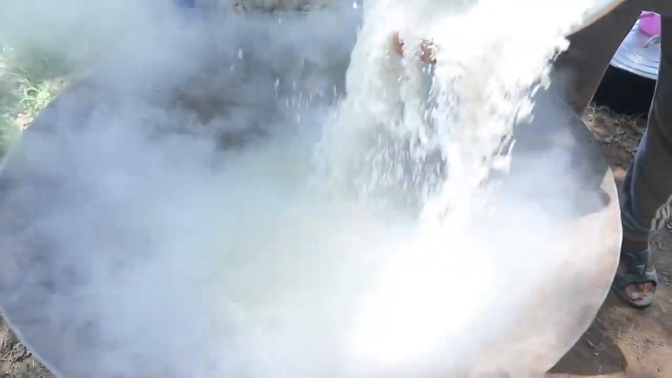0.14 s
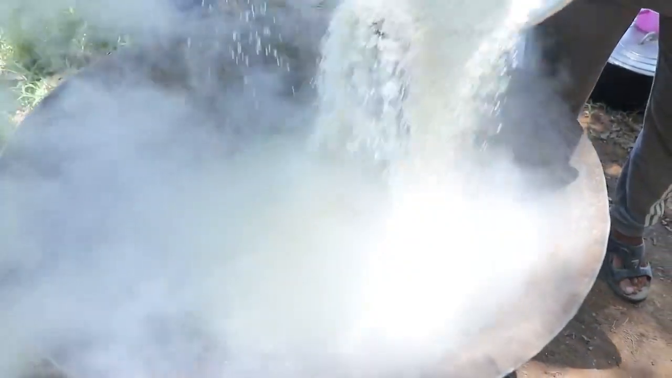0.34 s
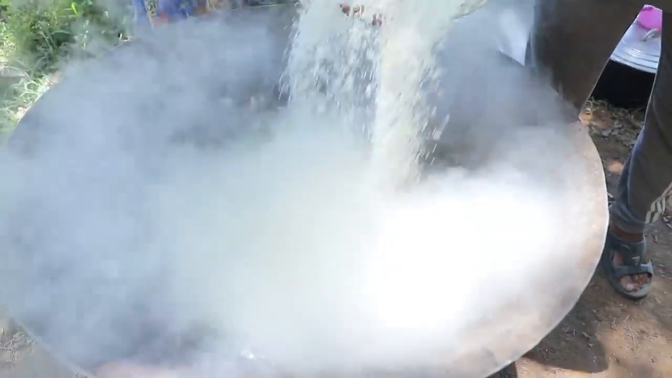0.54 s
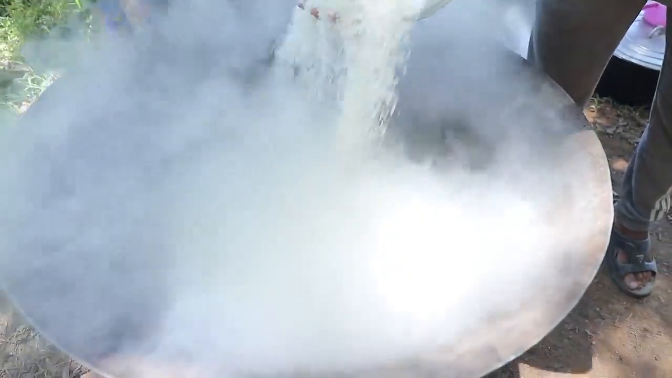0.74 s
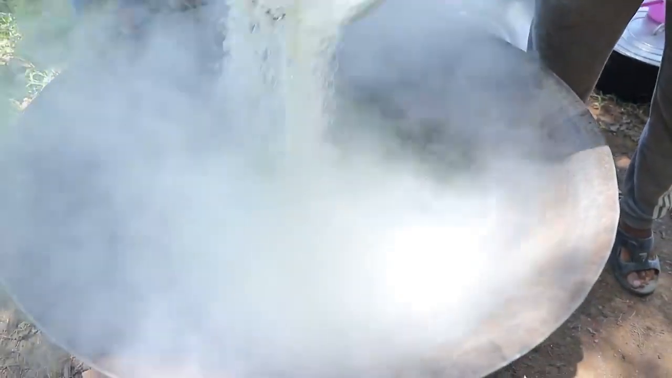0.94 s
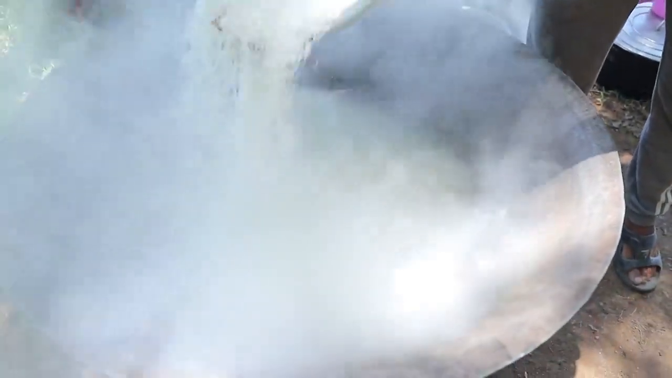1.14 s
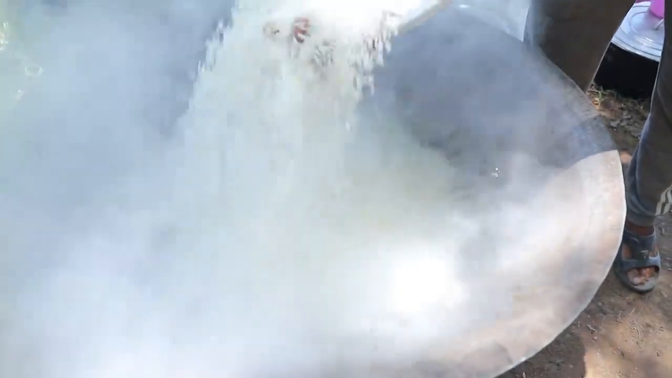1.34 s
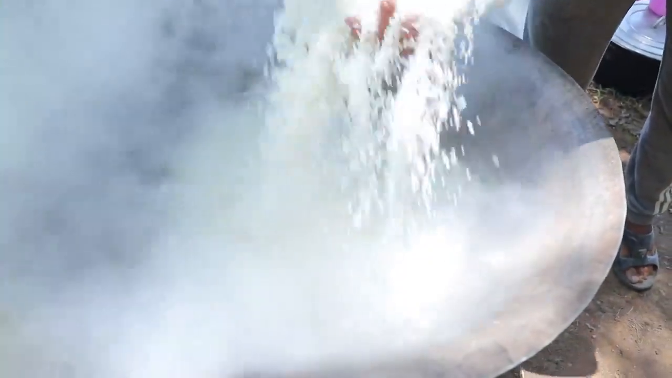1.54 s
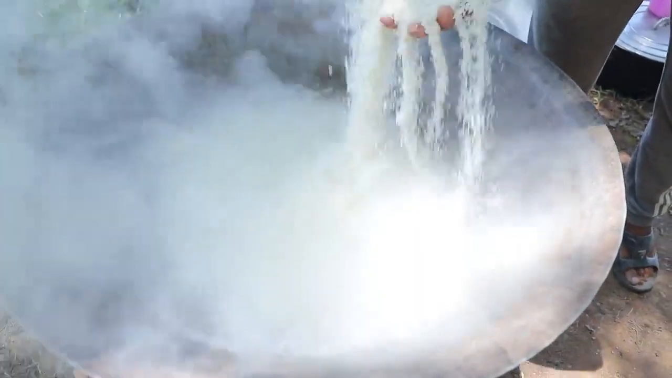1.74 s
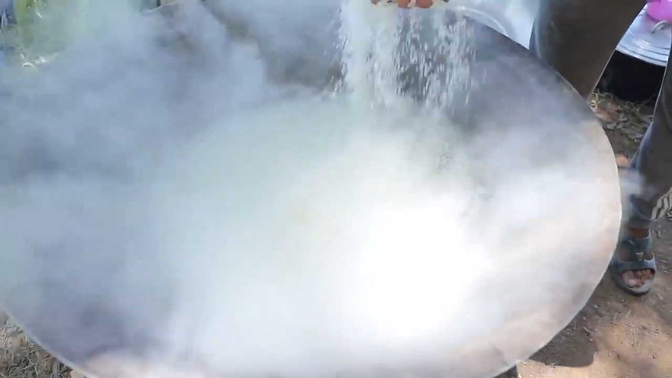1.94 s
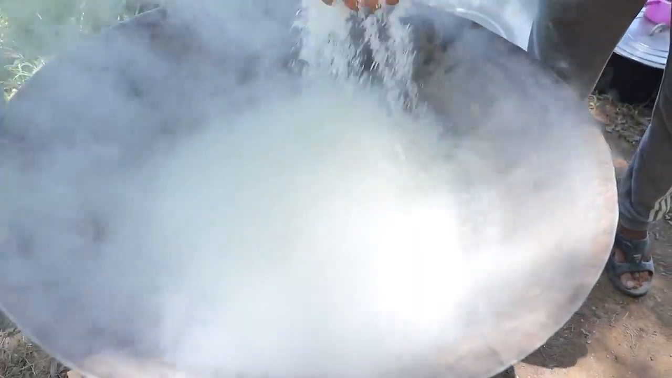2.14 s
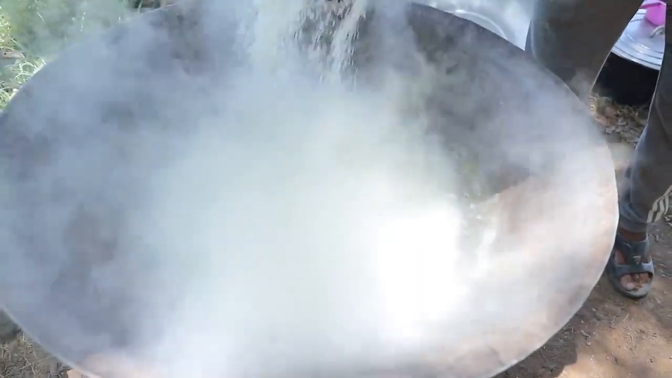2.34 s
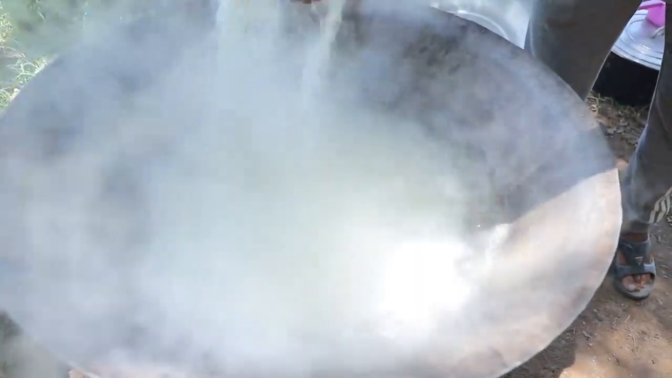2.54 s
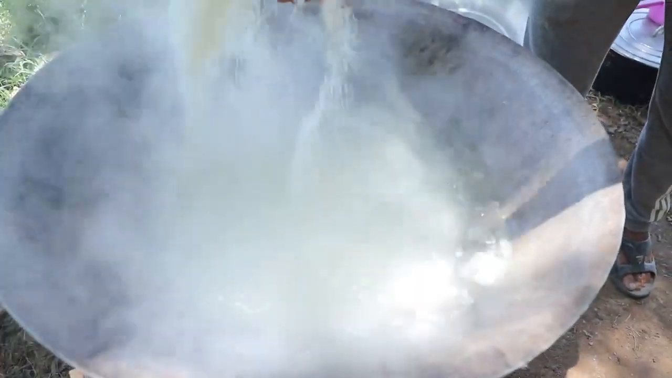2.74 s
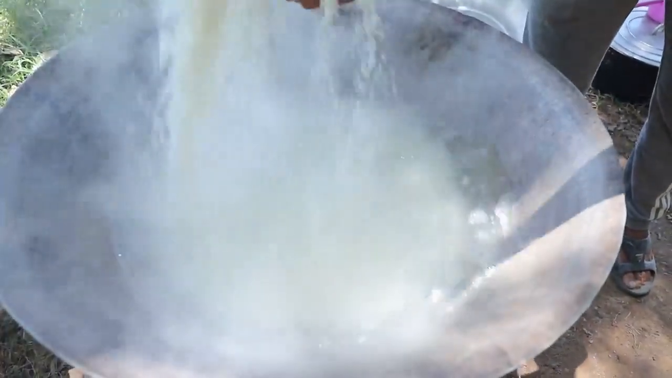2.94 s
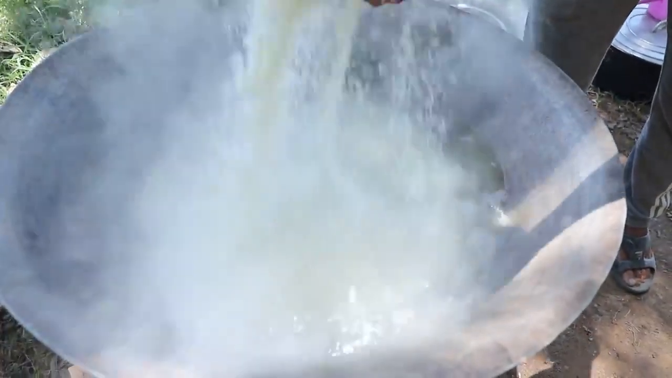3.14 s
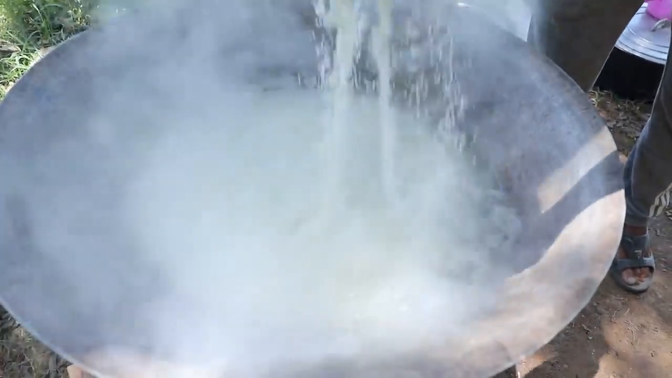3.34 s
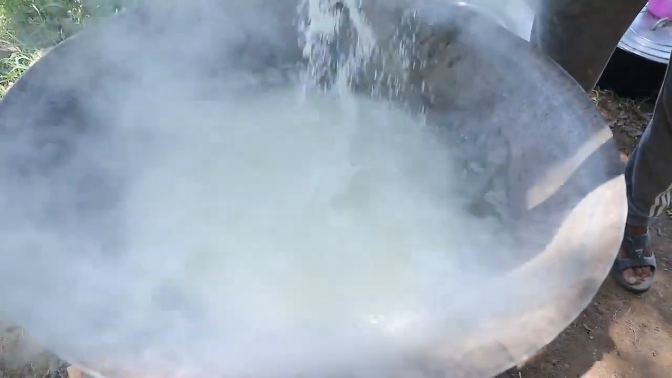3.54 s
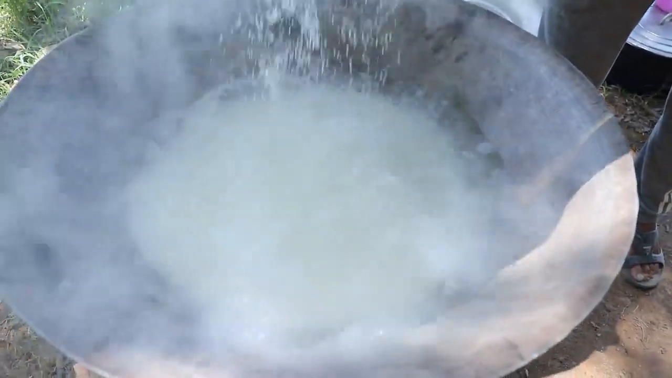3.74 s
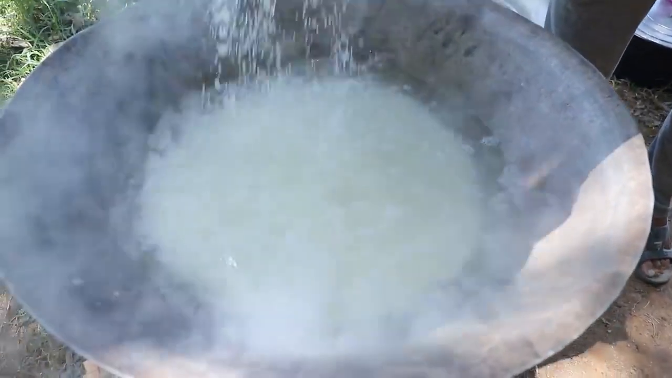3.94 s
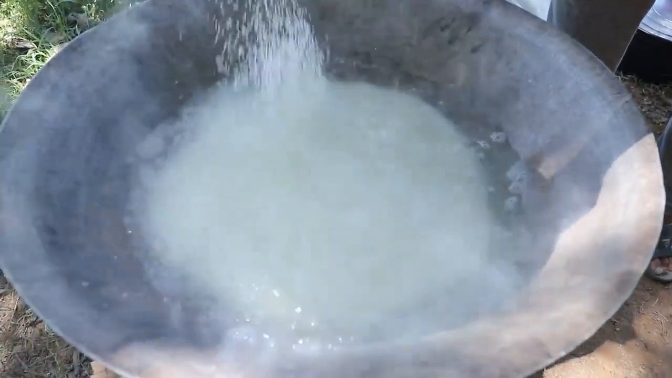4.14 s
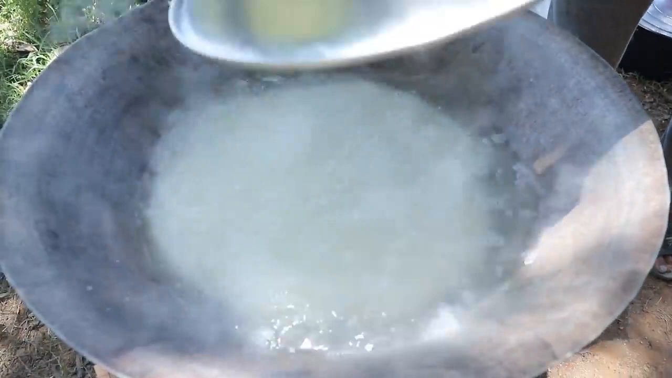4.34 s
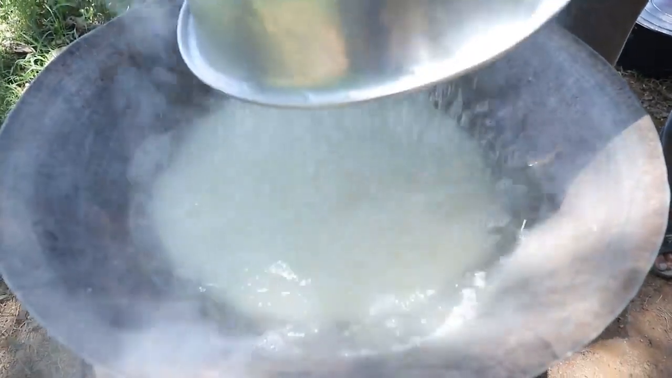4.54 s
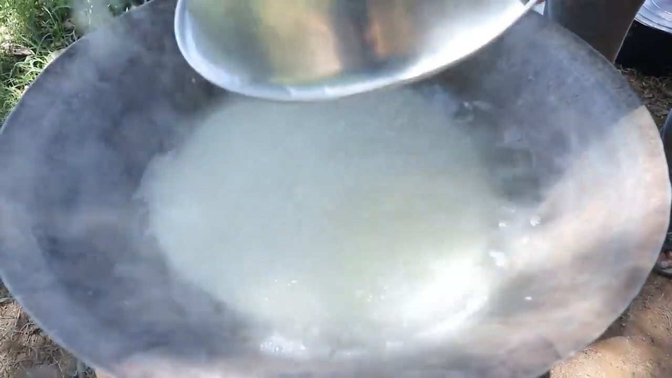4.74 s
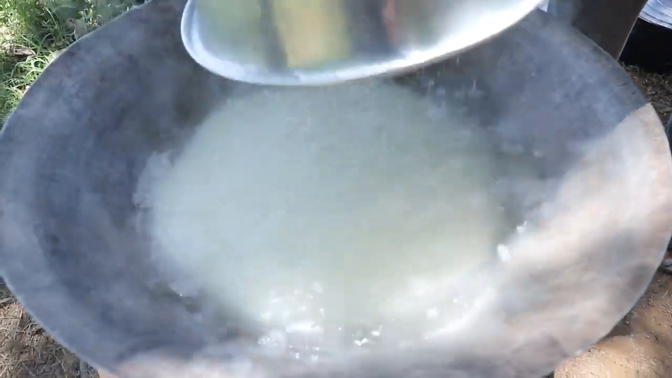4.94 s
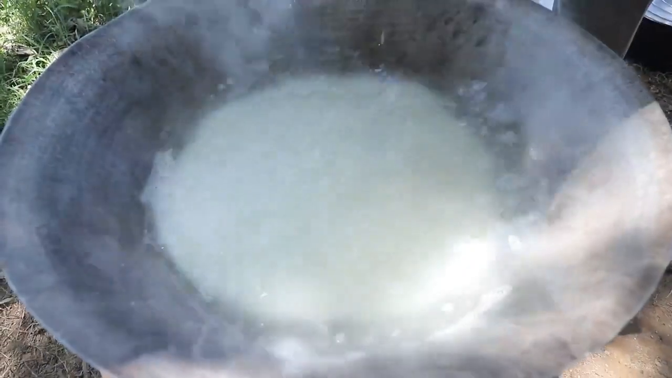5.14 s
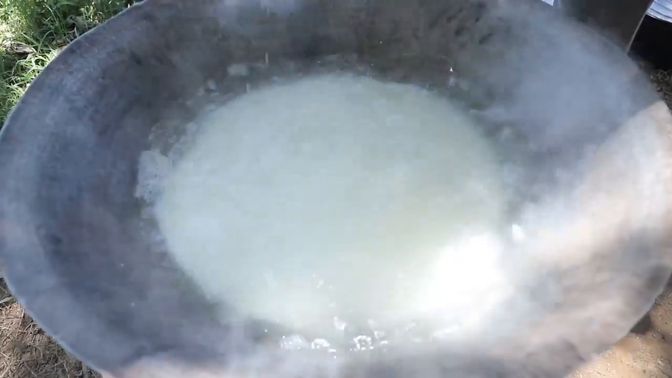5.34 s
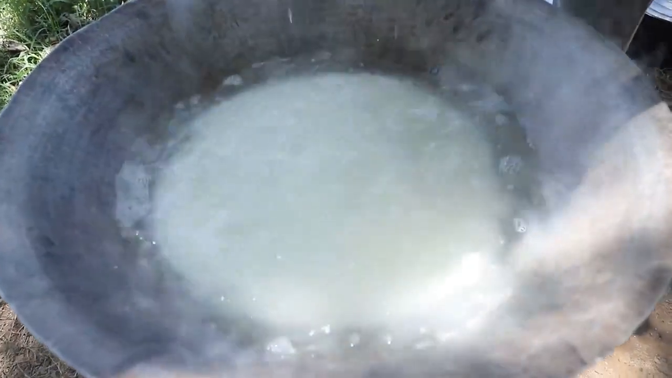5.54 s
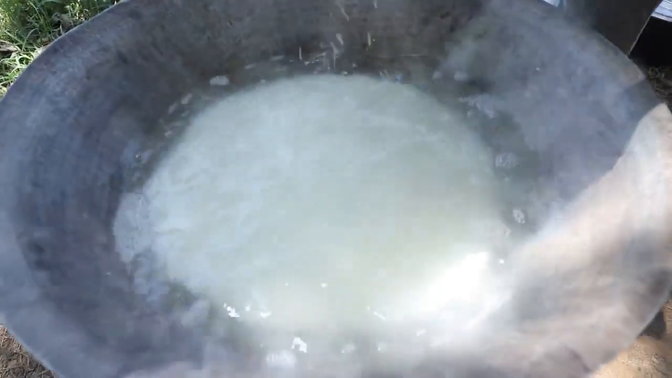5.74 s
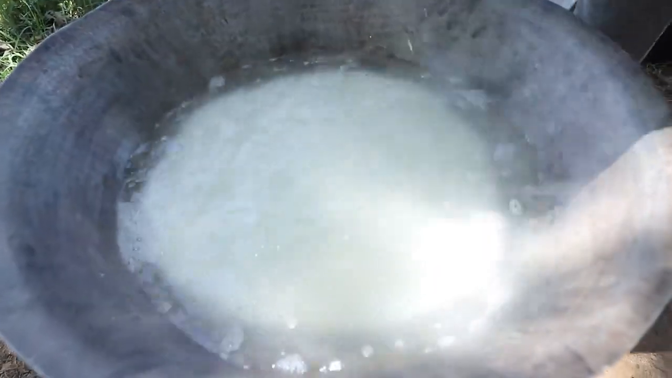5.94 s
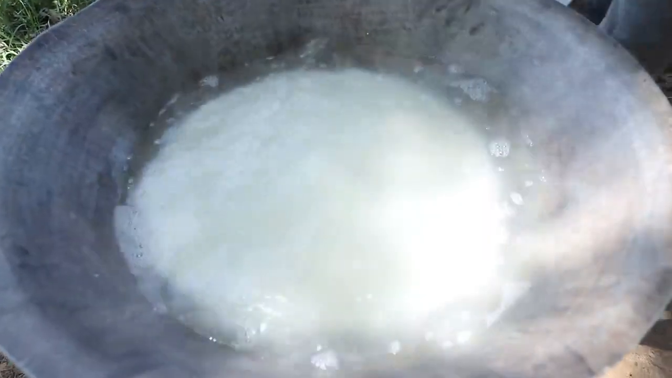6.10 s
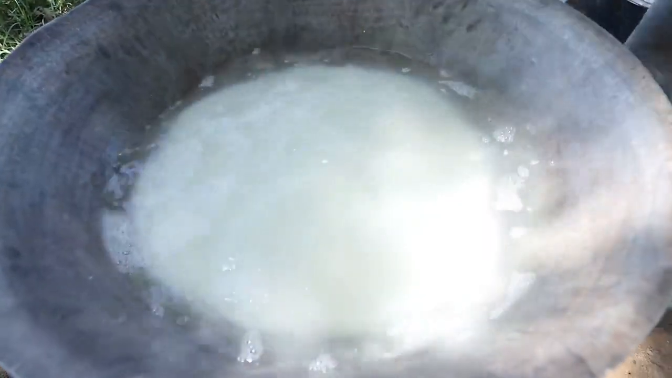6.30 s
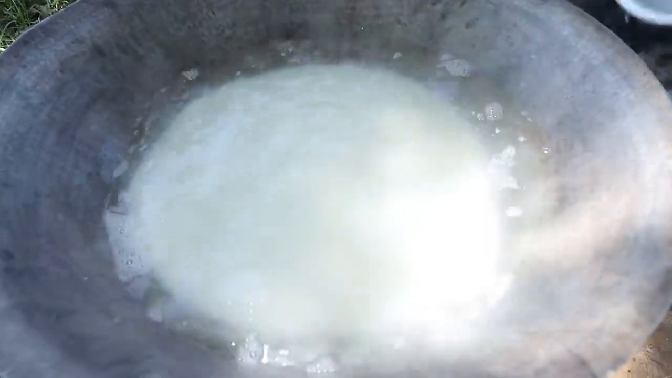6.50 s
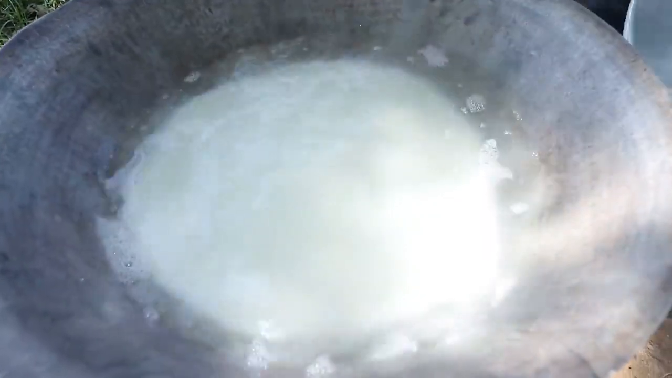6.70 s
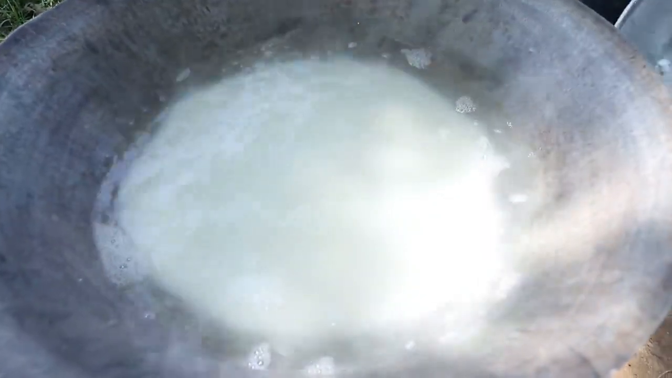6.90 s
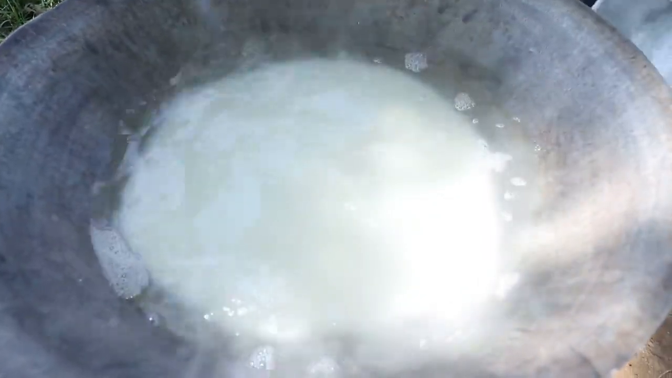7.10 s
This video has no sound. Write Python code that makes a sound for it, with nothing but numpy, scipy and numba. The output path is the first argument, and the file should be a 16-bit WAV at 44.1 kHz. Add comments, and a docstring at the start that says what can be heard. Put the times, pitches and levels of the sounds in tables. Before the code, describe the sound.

Rice pours with a dense bright hiss and wet plops into boiling water, then a metal pan is knocked hard three times over quiet simmering.

```python
"""Rice patters and hisses from a steel pan into a big wok of boiling water, outdoors, and clumps plop in.
The pan is knocked three times, hard enough to overload the microphone; then a hand scrapes and taps it.
One clear tap rings among these, and the water simmers on under a dull pop and a low gurgle.
Random clicks shaped by filters make the grains and scrapes; fading sine tones make the bubbles and the
ringing metal; filtered noise makes the splats, cracks and outdoor air. One nearby microphone hears it all."""
import sys
import numpy as np
from scipy import signal
from scipy.fft import rfft, irfft
from scipy.io import wavfile
from scipy.ndimage import uniform_filter1d, map_coordinates
from numba import njit

SR = 44100
rng = np.random.default_rng(int(sys.argv[2]) if len(sys.argv) > 2 else 0)


def inscribe(sig):
    """Save sig as 16-bit PCM at rate SR to the path in sys.argv[1].

    A 1-D sig is mono; a 2-D sig holds one channel per row.
    Samples are clipped to [-1, 1] before scaling.
    """
    pcm = np.round(np.clip(np.atleast_2d(sig).T, -1, 1) * 32767)
    wavfile.write(sys.argv[1], SR, pcm.astype(np.int16))


N = 316108  # length in samples

# In every table t60 is the time a sound takes to fade by 60 dB. Levels are before the mix trims below.
# Low outdoor air. Each row: frequency in Hz, level in dB.
AIR_COLOUR = [(25, -18), (70, -6.5), (170, -3), (320, -15), (8000, -30)]
# A soft swish beside the wok. Each row: middle in seconds, level in dB, spread in seconds, pitch in Hz.
SWISHES = [(6.009, -36.5, 0.022, 2000)]
# The water; the first levels hold from the start. Each row: time in seconds, bubbling in dB, sizzle in dB.
SIMMER = [(4.62, -41, -37.5), (5.04, -48, -42.5), (5.45, -47.5, -48), (6.19, -51.5, -53),
          (6.26, -43, -51.5), (6.48, -58, -58), (6.79, -60.5, -59), (6.89, -42.5, -49), (7.09, -53, -55.5)]
# Tone of the simmering water. Each row: frequency in Hz, level in dB.
SIMMER_COLOUR = [(250, 0.5), (700, -6.5), (2000, -3), (8500, -7.5), (16000, -20)]
# The stream of rice. Each row: time in seconds, plunge into the water in dB, hiss of single grains in dB.
POUR = [(0.0, -25.5, -23), (0.16, -27.5, -30), (0.24, -27, -24), (0.42, -28, -26), (0.58, -33.5, -28),
        (0.64, -27.5, -23), (0.95, -30.5, -21.5), (1.12, -33, -27), (1.5, -32.5, -28), (1.82, -29, -25),
        (2.22, -35.5, -27), (2.5, -35.5, -32), (2.8, -36, -27), (3.22, -34.5, -27.5), (3.44, -28.5, -20.5),
        (3.52, -37, -22.5), (3.62, -30.5, -23), (3.76, -36, -34.5), (3.87, -34.5, -37.5),
        (3.96, -43.5, -34.5), (4.28, -48.5, -41.5), (4.345, -36.5, -27.5), (4.42, -51, -57)]
# Tone of the rice meeting the water. Each row: frequency in Hz, level in dB.
POUR_COLOUR = [(60, -32), (140, -10), (215, -1.5), (430, -6.5), (1200, 0.5), (2300, -7.5), (3300, -2.5),
               (4600, 0), (7000, -5), (8500, 0.5), (10900, -12), (13800, -5.5), (16000, -20)]
# Thicker gushes of rice. Each row: middle in seconds, lift in dB, spread in seconds.
GUSHES = [(0.533, 5.5, 0.046), (1.507, 4.5, 0.0081), (4.24, 6, 0.0094)]
# The hollow tone of the stream in the wok. Each row: time in seconds, pitch in Hz, echo share from 0 to 1.
HOLLOW = [(.5, 2100, 0.04), (.9, 2230, 0.21), (1.6, 2400, 0), (2.36, 2150, 0.35), (2.6, 2340, 0.37),
          (2.76, 3190, 0.38), (3.05, 5060, 0.26), (3.2, 4670, 0)]
# The hardest grains ticking on the iron. Each row: start in seconds, peak in dB, pitch in Hz, t60 in seconds.
TICKS = [(.0652, -6, 4400, .004), (.6222, -5, 6800, .01), (1.0273, -5.5, 4200, .005),
         (2.0745, -10.5, 2930, .018), (2.1338, -5, 3790, .006), (3.041, -1.5, 6000, .033),
         (3.059, -5, 5300, 0.032), (3.5902, -3.5, 6800, 0.011), (3.6852, -5, 7500, 0.016),
         (3.7375, -11, 7000, .025), (4.0303, -12.5, 3280, 0.0063)]
# The biggest clumps and bursting bubbles. Each row: start in seconds, level in dB, pitch in Hz.
PLOPS = [(.089, -13, 1487), (.2908, -7, 1514), (0.3638, -7.5, 1580), (.531, -13, 796), (.785, -8, 1510),
         (.827, -14.5, 705), (0.926, -8.5, 1320), (2.052, -2, 1920), (2.335, -14.5, 854),
         (3.042, -10.5, 1290), (3.487, -13, 767), (3.607, -16, 804), (3.783, -17.5, 1080),
         (3.827, -10.5, 1440), (3.9052, -14, 890), (3.984, -18.5, 765), (4.031, -20.5, 760),
         (4.783, -10.5, 1006), (6.9134, -6, 1133), (7.011, -28.5, 1090)]
# Knocks on the pan. Each row: start in seconds, level in dB, hardness in Hz, crack in dB,
# delay of the rebound in seconds, pitch of the modes left quiet in Hz, ring of the rim in dB.
KNOCKS = [(4.4707, 1.5, 4020, 5, 0.014, 210, -11), (4.841, 12.5, 383, 0.5, 0.0087, 1350, -12),
          (5.16, -1, 398, -9.5, .0085, 1280, -11)]
# Modes (natural tones) of the pan. Each row: pitch in Hz, level in dB, t60 in seconds.
PAN = [(70.8, -7, 0.023), (125, -8, 0.027), (212, 1.5, 0.03), (338, -1, 0.046), (481, -7.5, 0.072),
       (778.6, -3, 0.083), (858, -7, 0.08), (1013, -11.5, 0.083), (1210, -8.5, 0.08), (1340, -7, 0.046),
       (1476, -0.5, 0.05), (1730, -8.5, 0.052)]
# Long-ringing modes of the pan's rim. Each row: pitch in Hz, level in dB, t60 in seconds.
RIM = [(920, -9, 0.32), (1025, -10, 0.29), (2471, -10, .16), (2635, -4, 0.16), (2850, -5, 0.11),
       (3080, -3.5, 0.13), (3700, -1, .09)]
# Tone of the crack of a knock. Each row: frequency in Hz, level in dB.
CRACK_COLOUR = [(100, 0), (300, -3.5), (1500, -6), (4000, -11), (16000, -27)]
# Loose rice sliding off the pan. Each row: start in seconds, level in dB, t60 in seconds.
SLIDES = [(4.505, -12.5, 0.27), (4.712, -22, 0.36), (4.877, -20.5, 0.12), (4.988, -26.5, 0.094),
          (5.619, -20.5, 0.22), (5.722, -24, 0.079), (5.785, -23, 0.18)]
# Short scrapes and taps of a hand on the pan. Each row: start in seconds, level in dB.
SCRAPES = [(5.279, -19), (5.301, -18.5), (5.325, -19.5), (5.362, -20.5), (5.694, -30), (5.708, -27),
           (5.777, -17.5), (5.801, -16), (5.814, -16.5), (5.831, -13), (5.873, -18.5), (5.9121, -10),
           (5.9333, -14), (5.947, -17.5)]
# Tone of the scrapes, the slides and the stray grains. Each row: frequency in Hz, level in dB.
SCRAPE_COLOUR = [(400, -24), (1000, -3), (2100, -9), (3500, 0), (6200, 0), (8700, 0), (11000, -8),
                 (14000, -8), (16000, -21)]
# Ring of the metal under a scrape or slide. Each row: pitch in Hz, level in dB.
METAL = [(1080, -8), (2530, -0.5), (3410, -2.5), (3820, 3), (4720, 1), (6280, -3), (8400, -2.5)]
# Large steam bubbles, the last ones running into a gurgle. Each row: start in seconds, peak in dB, pitch in Hz.
BLIPS = [(5.478, -36.5, 786), (5.59, -41, 806), (5.705, -36, 786), (6.172, -41.5, 405), (6.409, -41, 420),
         (7.126, -32, 207), (7.142, -26, 440), (7.152, -27, 233)]
# Modes of the one hard, bright tap on the steel. Each row: pitch in Hz, level in dB.
CLINK = [(3677, -6), (5400, 1.5), (7370, -4), (9250, 4.5), (11200, -5), (12800, -1)]

SURGE_DB, SURGE_PER_S = 1.49, 18  # the stream comes unevenly over the rim
FIZZ_DB, FIZZ_OCTAVES = -5, .17  # fine bubbles around the hollow pitch
SLAP_DB, SLAP_CYCLES = -3.5, 4.3  # the surface slaps shut in a few cycles
PLOP_CYCLES = 42  # cycles until a pocket of air has died
TOUCH_LEAD_S, TOUCH_DB, TOUCH_CRACK_DB, TOUCH_HZ = 0.0038, -14.5, -9, 2000  # light touch before each blow
REBOUND_DB, REBOUND_CRACK_DB, REBOUND_HARDER = -2, -2, 1.9  # the pan hits again, harder in tone
NODE_DB, NODE_OCTAVES = -13, 0.49  # modes with a node (still point) under the blow stay quiet
RIM_LAG_S = 0.01  # the rim takes a moment to start ringing
SLIDE_SWELL = 0.051  # share of its t60 that a slide takes to build up
SCRAPE_SWELL_S, SCRAPE_T60_S = 0.0021, 0.05
METAL_DB, METAL_SCATTER_DB, METAL_WIDTH_HZ = 7, 3, 79
BLIP_T60_S, BLIP_RISE_PER_S = 0.069, 1.7  # fade; share by which the pitch rises each second
CLINK_S, CLINK_DB, CLINK_CYCLES = 5.5302, -20, 154  # start; level; cycles until a mode has died
TOP_HZ = 16000


def undb(db):
    """Turn decibels into a gain."""
    return 10 ** (np.asarray(db) / 20)


def unit(x):
    """Scale a sound to an average (rms) level of 1."""
    return x / np.sqrt(np.mean(x ** 2) + 1e-20)


def curves(table):
    """Draw lines between the rows of a table that starts with seconds: one value a sample."""
    s, *columns = np.transpose(table)
    return [np.interp(np.arange(N) / SR, s, c) for c in columns]


def add(out, s, sound):
    """Mix a sound in at a time in seconds."""
    start = max(int(s * SR), 0)
    out[start:start + len(sound)] += sound[:max(N - start, 0)]


def fade(t, t60):
    """Die away smoothly, losing 60 dB in t60 seconds."""
    return np.exp(-np.log(1000) * t / t60)


def band(x, kind, hz, order=3):
    """Keep part of the frequency range with a Butterworth filter."""
    hz = np.minimum(hz, SR / 2 - 1000)
    return signal.sosfilt(signal.butter(order, hz, kind, fs=SR, output="sos"), x)


def colour(x, points, size=2048):
    """Shape the tone through (Hz, dB) points without sounding early; the result has rms 1."""
    hz, db = np.transpose(points)
    gain_db = np.interp(np.log(np.arange(size // 2 + 1) * SR / size + 1), np.log(hz), db)
    # folding the cepstrum puts the filter's energy at its start
    cepstrum = irfft(np.log(undb(gain_db)))
    cepstrum[1:size // 2] *= 2
    cepstrum[size // 2 + 1:] = 0
    impulse = irfft(np.exp(rfft(cepstrum)))
    return unit(signal.fftconvolve(x, impulse)[:len(x)])


def walk(rate):
    """Wander between random levels, rate of them a second; rms near 1."""
    hold = max(int(SR / rate), 1)
    steps = np.repeat(rng.standard_normal(N // hold + 1), hold)
    return unit(uniform_filter1d(steps, hold)[:N])


def patter(rate, spread_db):
    """Tiny impacts at random moments, with sizes scattered in dB."""
    hit = rng.random(N) < rate / SR
    size_db = spread_db * np.minimum(rng.standard_normal(N), 2)
    return unit(hit * rng.choice([-1, 1], N) * undb(size_db))


def clumping(rate, t60):
    """Sudden surges that die away, as clumps of grains land; mean 1."""
    hits = (rng.random(N) < rate / SR) * rng.exponential(size=N)
    surges = signal.fftconvolve(hits, fade(np.arange(SR // 10) / SR, t60))[:N]
    return np.abs(surges / np.mean(surges))


@njit
def ring(starts, hz, cycles, size, glide):
    """Fading sines that rise in pitch as they die, like bubbles nearing the surface."""
    out = np.zeros(N)
    for k in range(len(starts)):
        length, phase = int(cycles[k] * SR / hz[k]), 0.
        for i in range(min(length, N - starts[k])):
            phase += 2 * np.pi * hz[k] * (1 + glide * i / length) / SR
            out[starts[k] + i] += size[k] * np.exp(-6.9 * i / length) * np.sin(phase)
    return out


def bubbles(rate, centre_hz, octaves, cycles, spread_db, glide=0.11):
    """A swarm of bubbles spread some octaves either side of a pitch."""
    when, pitch, life, loud = rng.random((int(rate * N / SR), 4)).T
    starts = (when * N).astype(np.int64)
    ratio = 2 ** (octaves * (2 * pitch - 1))
    # small bubbles are short and sharp
    size = undb(-spread_db * np.log(np.maximum(loud, np.exp(-4)))) * ratio
    hz = (centre_hz * np.ones(N))[starts] * ratio
    return unit(ring(starts, hz, cycles * (.5 + life), size, float(glide)))


def surroundings():
    """Low-pitched noise makes the wandering outdoor rumble; a band of noise swells into a soft swish."""
    t = np.arange(N) / SR
    out = colour(rng.standard_normal(N), AIR_COLOUR) * undb(-52.0 + 1.5 * walk(12.0))
    for s, db, length, hz in SWISHES:
        rub = unit(band(rng.standard_normal(N), "band", [hz * 0.32, hz * 1.8], order=2))
        out += undb(db) * rub * np.exp(-.5 * ((t - s) / length) ** 2)
    return out


def simmer():
    """Small bubbles burst around the rice and sizzle at the hot rim."""
    bubbling_db, sizzle_db = curves(SIMMER)
    water = colour(patter(rate=9700, spread_db=8.0), SIMMER_COLOUR)
    small_blips = bubbles(rate=90, centre_hz=622, octaves=1.0, cycles=39, spread_db=2.5)
    bubbling = unit(band(water, "band", [250, 2500])) + undb(-2.0) * small_blips
    bubbling *= undb(bubbling_db - 3.0 + 2.6 * walk(35))
    sizzle = unit(band(water, "high", 2500)) * undb(sizzle_db + 0.72 * walk(40))
    return bubbling + sizzle


def hollow(x):
    """A close echo off the curved iron lifts one pitch and cancels the octave below; it slides with the stream."""
    hz, share = curves(HOLLOW)
    share = np.clip(share, 0, .9)
    echo = map_coordinates(x, [np.arange(N) - SR / hz], order=3, mode="nearest")
    # the grains scatter the treble and the bass bends round the wall, so neither echoes
    treble = signal.sosfiltfilt(signal.butter(2, 6500, "high", fs=SR, output="sos"), echo)
    bass = signal.sosfiltfilt(signal.butter(2, 700, "low", fs=SR, output="sos"), echo)
    return x + share * (echo - treble - bass)


def pour():
    """Grains strike the water and drag air under; the thinner the stream, the more single clumps stand out."""
    t = np.arange(N) / SR
    plunge_db, hiss_db = curves(POUR)
    gush_db = sum(db * np.exp(-.5 * ((t - s) / length) ** 2) for s, db, length in GUSHES)
    surge_db = SURGE_DB * walk(SURGE_PER_S) + gush_db

    lumpy = np.clip(0.2 * undb(-.5 * (hiss_db - hiss_db.max())), 0, 1)
    stream = np.sqrt(1 - lumpy + lumpy * clumping(rate=140, t60=0.041))
    impacts = patter(rate=4500, spread_db=2.0) * stream
    trapped_air = bubbles(rate=600, centre_hz=788, octaves=1.81, cycles=18.0, spread_db=3.5)
    water = colour(impacts + undb(-11.5) * trapped_air, POUR_COLOUR)

    small_plops = bubbles(rate=42, centre_hz=1146, octaves=1.3, cycles=38, spread_db=3.5)
    plunge = unit(band(water, "low", 1590)) + undb(-11.0) * small_plops
    plunge *= undb(plunge_db + surge_db - 1.32)
    splash = unit(band(water, "band", [1800, 3000]))
    splash *= undb((plunge_db + hiss_db) / 2 + surge_db - 4.0)
    # single grains, each with its own pitch
    pings = bubbles(rate=450, centre_hz=5660, octaves=0.796, cycles=66, spread_db=2.0)
    hiss = unit(band(water, "high", 4140)) + undb(-9) * pings
    hiss *= undb(hiss_db + surge_db - 1.1)

    hollow_hz, share = curves(HOLLOW)
    fizz = bubbles(rate=900, centre_hz=hollow_hz, octaves=FIZZ_OCTAVES, cycles=57.6, spread_db=3.5)
    fizz *= share * undb(hiss_db + FIZZ_DB)
    running = np.clip(1 - (t - POUR[-1][0]) * 20, 0, 1)  # the stream ends as the pan empties
    return (hollow(plunge + splash + hiss) + fizz) * running


def strays():
    """Stray grains bounce on the bare iron beside the stream and stand out as it thins."""
    grains = colour(patter(rate=4900, spread_db=6.5), SCRAPE_COLOUR)
    rattle = np.sqrt(clumping(rate=54, t60=0.012)) * grains
    return rattle * undb(-39.5) * (np.arange(N) / SR < POUR[-2][0])


def ticks():
    """A single hard grain gives a very short bright burst of noise."""
    out, t = np.zeros(N), np.arange(SR // 20) / SR
    for s, db, hz, t60 in TICKS:
        noise = rng.standard_normal(len(t)) * fade(t, t60)
        burst = band(noise, "band", [hz * 0.72, hz * 1.27], order=2)
        add(out, s, undb(db - 0.9) * burst / np.abs(burst).max())
    return out


def plops():
    """A clump slaps the surface; the pocket of air rings briefly at a few pitches inside a wet splat."""
    out, t = np.zeros(N), np.arange(SR // 8) / SR
    for s, db, hz in PLOPS:
        shape = 1 + 0.078 * rng.standard_normal(size=3)  # no two pockets are alike
        tones = zip(shape, [(.6, 0.33), (1, 0.78), (1.44, 0.37)])  # pitch ratio, gain
        pocket = sum(gain * np.sin(2 * np.pi * hz * ratio * k * t) for k, (ratio, gain) in tones)
        splat = unit(band(rng.standard_normal(len(t)), "low", 2 * hz))
        body = (undb(-8.5) * pocket + undb(-9) * splat) * fade(t, PLOP_CYCLES / hz)
        body = band(body, "band", [hz / 2, 2 * hz])
        slap = undb(SLAP_DB) * np.sin(2 * np.pi * hz * t) * fade(t, SLAP_CYCLES / hz)
        add(out, s, undb(db) * (band(slap, "high", hz / 2, order=1) + body))
    return out


def contacts():
    """Every knock is a light touch, the blow and a rebound: start, level, hardness, crack, quiet pitch."""
    for s, db, hard_hz, crack_db, rebound_s, node_hz, _ in KNOCKS:
        yield s - TOUCH_LEAD_S, TOUCH_DB, TOUCH_HZ, TOUCH_CRACK_DB, node_hz
        yield s, db, hard_hz, crack_db, node_hz
        yield s + rebound_s, REBOUND_DB, REBOUND_HARDER * hard_hz, REBOUND_CRACK_DB, node_hz


def knocks():
    """Each contact cracks and rings the hand-damped pan; soft ones rouse less treble, and the free rim rings on."""
    out, t = np.zeros(N), np.arange(SR // 3) / SR
    for s, db, hard_hz, crack_db, node_hz in contacts():
        grip = 1 + 0.014 * rng.standard_normal(len(PAN))  # the hand detunes the modes a little
        shell = np.zeros(len(t))
        for k, (hz, mode_db, t60) in enumerate(PAN):
            quiet_db = NODE_DB * np.exp(-(np.log2(hz / node_hz) / NODE_OCTAVES) ** 2)
            gain = (-1) ** k * undb(mode_db + quiet_db) / np.hypot(1, hz / hard_hz)
            shell += gain * np.sin(2 * np.pi * hz * grip[k] * t) * fade(t, t60)
        crack = colour(rng.standard_normal(len(t)), CRACK_COLOUR) * fade(t, 0.058)
        # loose grains in the pan
        rattle = band(rng.standard_normal(len(t)), "band", [2500, 9000], order=1) * fade(t, 0.18)
        add(out, s, undb(db) * shell + undb(crack_db) * (crack + undb(-22.0) * rattle))
    for s, *_, rim_db in KNOCKS:
        rim = sum(undb(db) * np.sin(2 * np.pi * (hz * t + rng.random())) * fade(t, t60)
                  for hz, db, t60 in RIM)
        add(out, s + RIM_LAG_S, undb(rim_db - 9.0) * rim)
    return band(out, "high", 69, order=2)


def scrapes_and_slides():
    """Short bright scrapes and taps of a hand, and rice sliding off, each ring the pan's metal differently."""
    out, t = np.zeros(N), np.arange(SR // 3) / SR
    friction = colour(patter(rate=9000, spread_db=4.5), SCRAPE_COLOUR)
    strokes = [(s, db, SLIDE_SWELL * t60, t60) for s, db, t60 in SLIDES]
    strokes += [(s, db, SCRAPE_SWELL_S, SCRAPE_T60_S) for s, db in SCRAPES]
    for s, db, swell, t60 in strokes:
        envelope = np.minimum(t / swell, 1) * fade(np.maximum(t - swell, 0), t60)
        burst = friction[int(s * SR):][:len(t)] * envelope
        metal = np.zeros(len(t))
        for hz, mode_db in METAL:
            gain = undb(METAL_DB + mode_db + METAL_SCATTER_DB * rng.standard_normal())
            edges = [hz - METAL_WIDTH_HZ / 2, hz + METAL_WIDTH_HZ / 2]
            metal += gain * band(burst, "band", edges, order=1)
        tight = min(0.024 / t60, 1)  # a shorter burst rings the metal more
        stroke = band(burst + metal * np.sqrt(tight), "high", 350, order=1)
        add(out, s, undb(db - 3.7 - 2.2 * tight) * stroke)
    return out


def blips():
    """Large steam bubbles well up through the rice, each a round tone that rises a little."""
    out, t = np.zeros(N), np.arange(SR // 8) / SR
    for s, db, hz in BLIPS:
        swell = (1 - np.exp(-t * hz)) * fade(t, BLIP_T60_S)
        tone = np.sin(2 * np.pi * hz * t * (1 + BLIP_RISE_PER_S * t / 2))
        add(out, s, undb(db) * swell / swell.max() * tone)
    return out


def clink():
    """A hard tap clicks and rings a few high modes of the steel; the highest die first."""
    out, t = np.zeros(N), np.arange(SR // 8) / SR
    click = unit(band(rng.standard_normal(len(t)), "band", [2800, 13000], order=1)) * fade(t, .033)
    add(out, CLINK_S, undb(-17) * click)
    tones = sum(undb(db) * np.sin(2 * np.pi * (hz * t + rng.random())) * fade(t, CLINK_CYCLES / hz)
                for hz, db in CLINK)
    add(out, CLINK_S, undb(CLINK_DB) * tones)
    return out


def scene():
    """Add all sources at one microphone, the same in both channels."""
    mono = surroundings() + simmer() + pour() + strays() + ticks() + plops()
    mono += knocks() + scrapes_and_slides() + blips() + clink()
    return np.array([mono, mono])


def record(dry):
    """The overloaded microphone clips flat at full scale; then the top of the treble is cut."""
    clipped = np.clip(dry, -1, 1)
    return signal.sosfiltfilt(signal.ellip(8, .05, 50, TOP_HZ, fs=SR, output="sos"), clipped)


dry = scene()
out = record(dry)
inscribe(out)
```